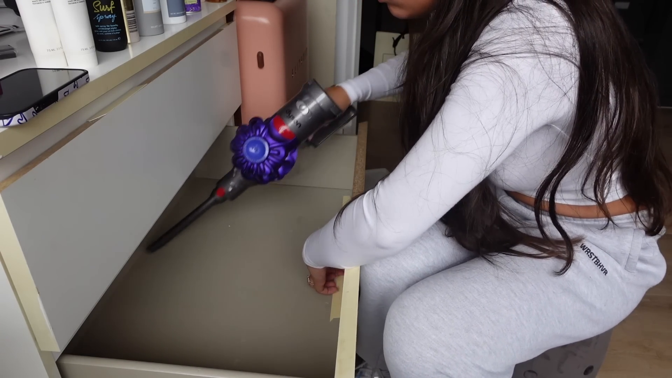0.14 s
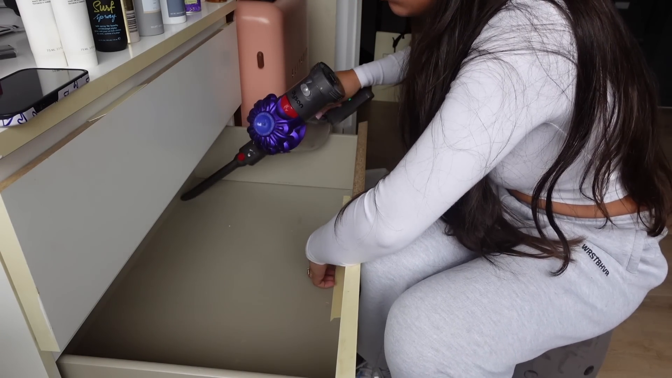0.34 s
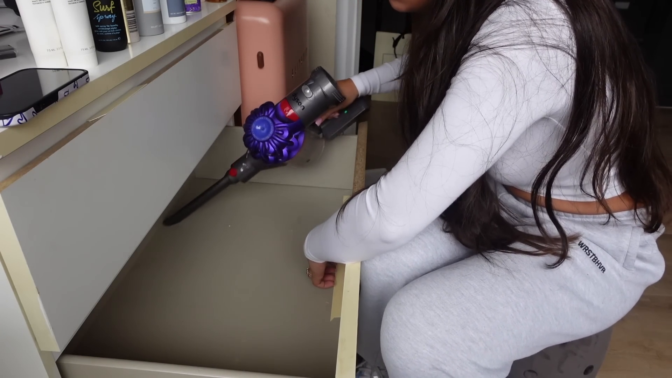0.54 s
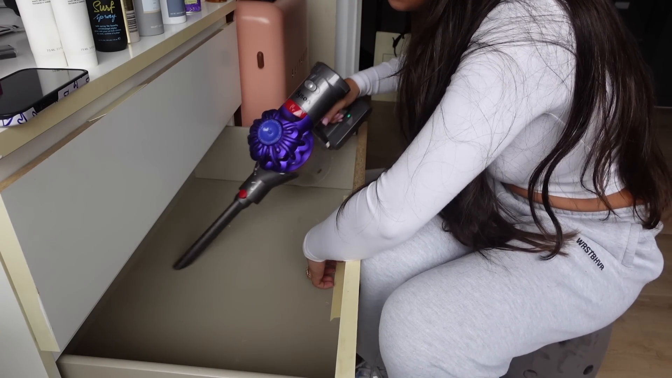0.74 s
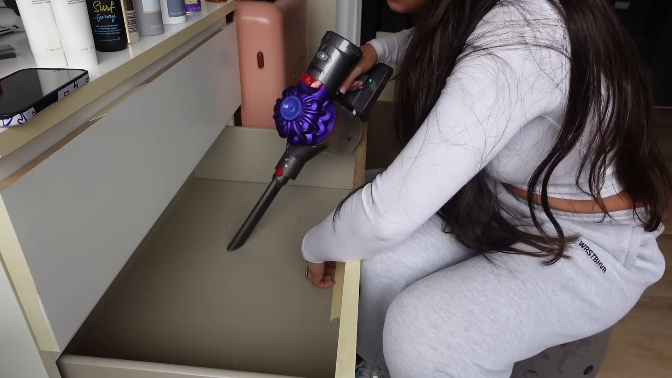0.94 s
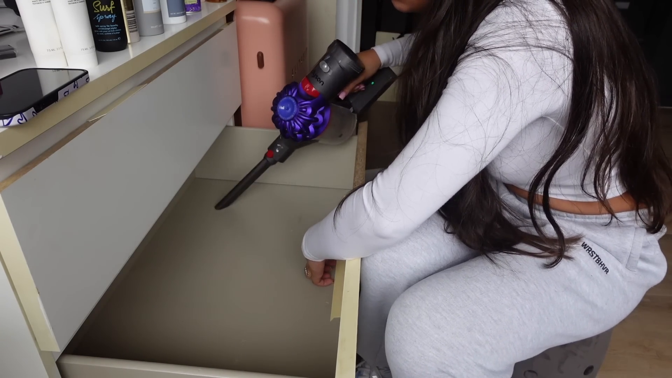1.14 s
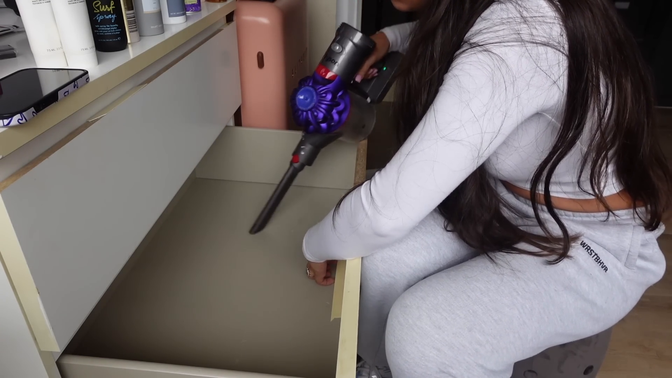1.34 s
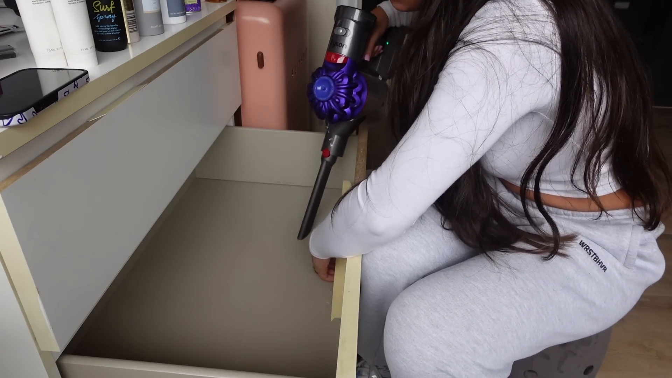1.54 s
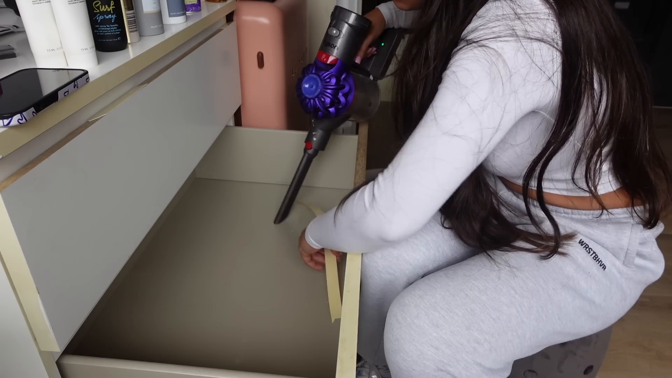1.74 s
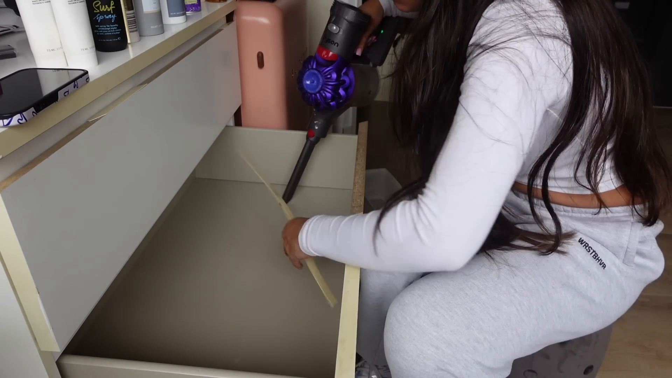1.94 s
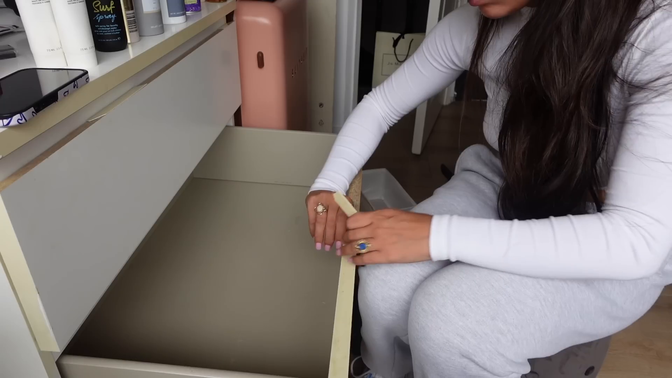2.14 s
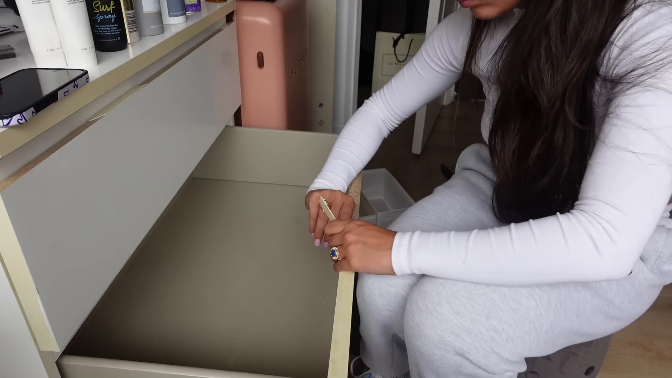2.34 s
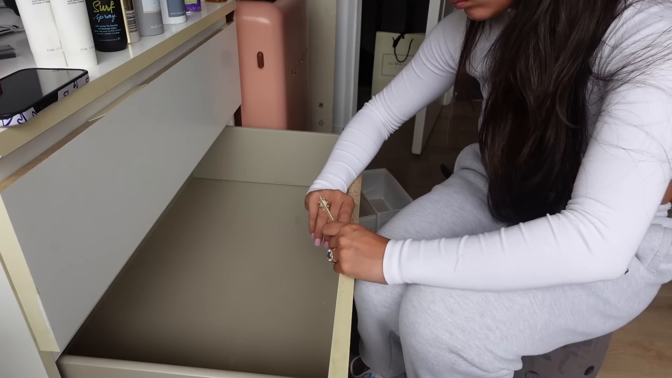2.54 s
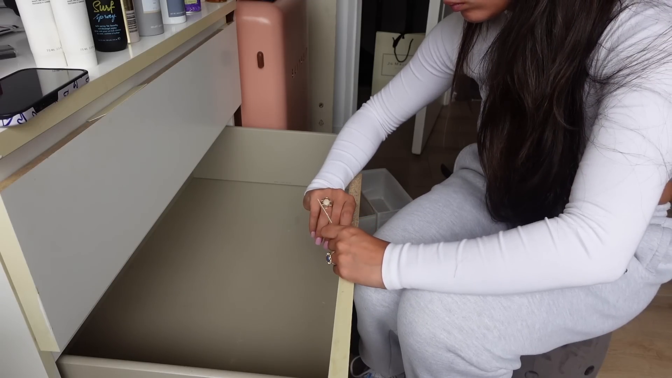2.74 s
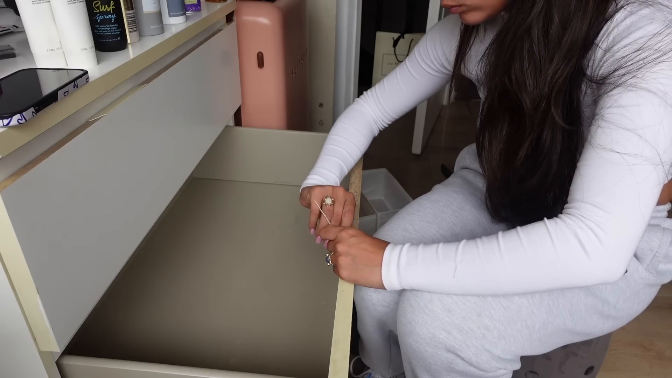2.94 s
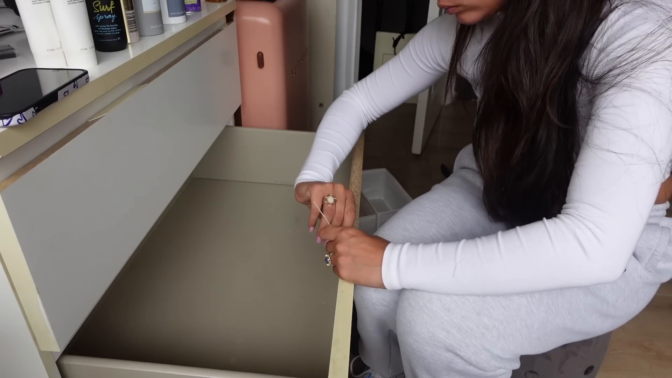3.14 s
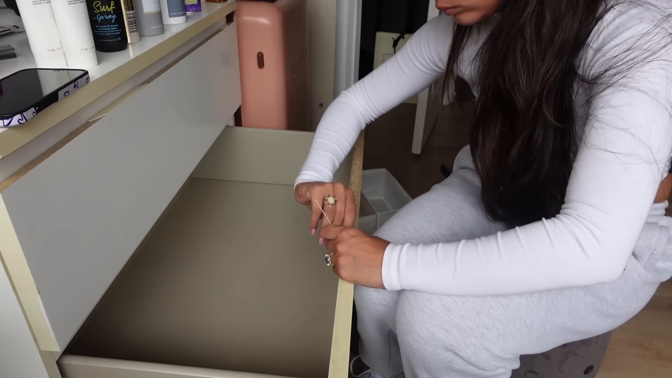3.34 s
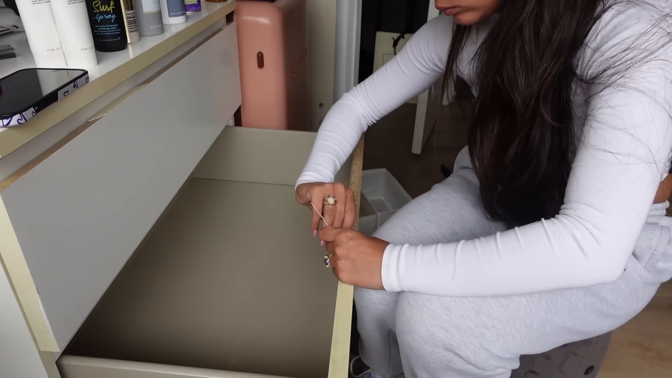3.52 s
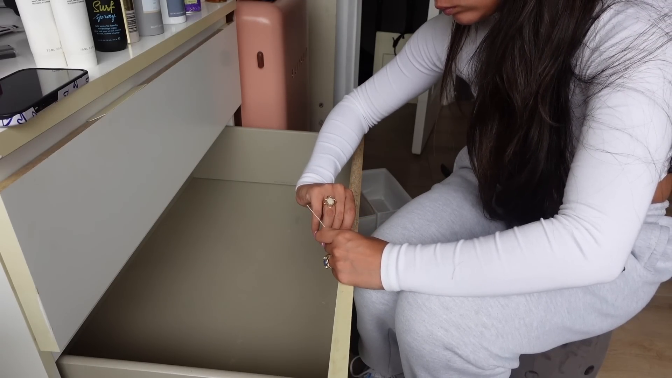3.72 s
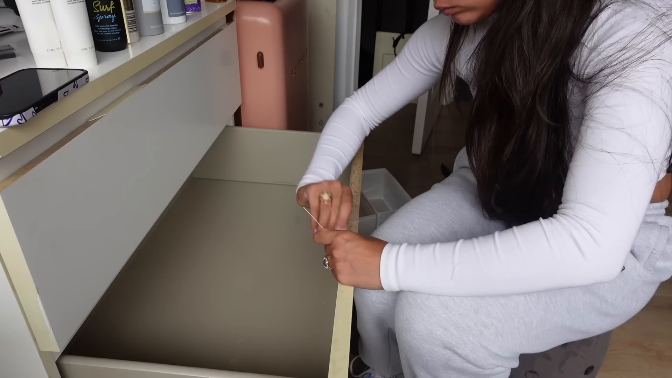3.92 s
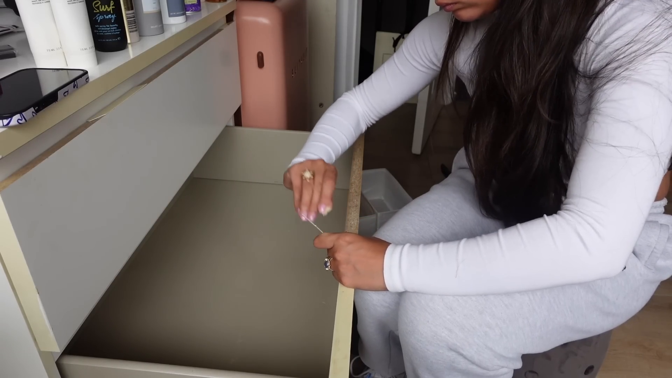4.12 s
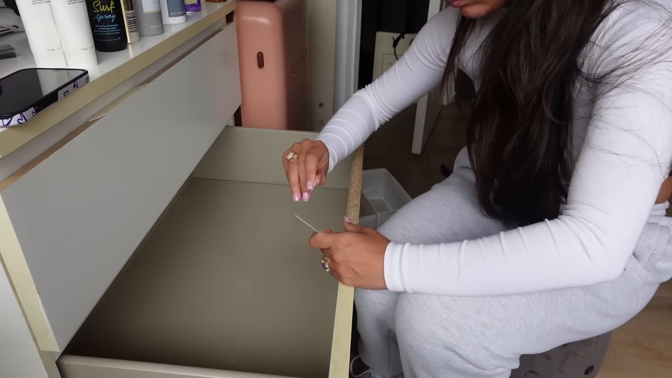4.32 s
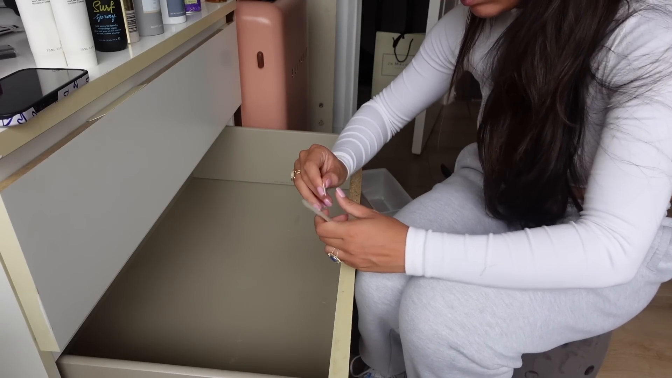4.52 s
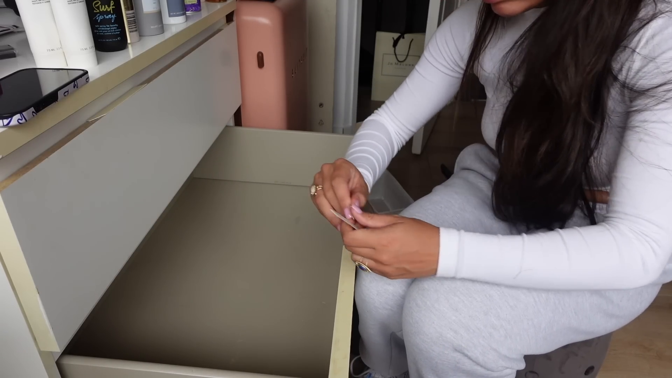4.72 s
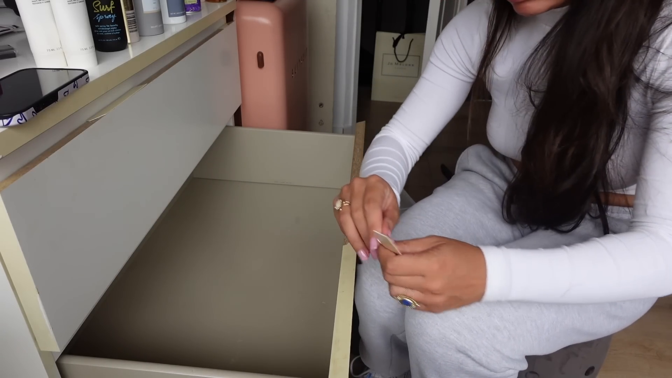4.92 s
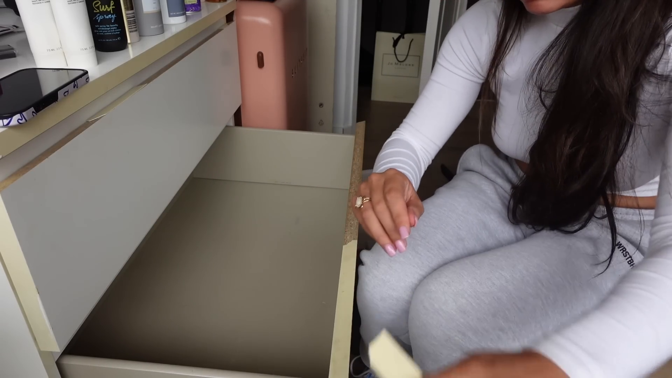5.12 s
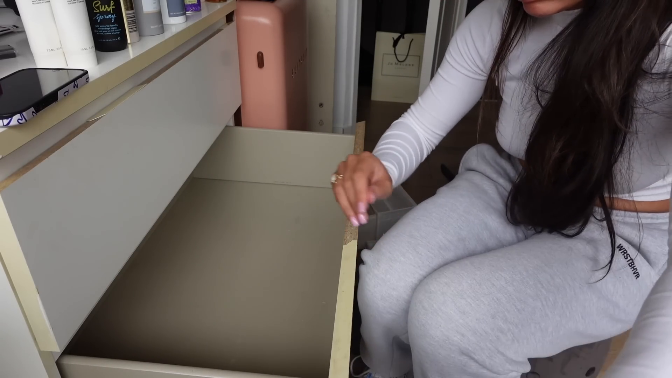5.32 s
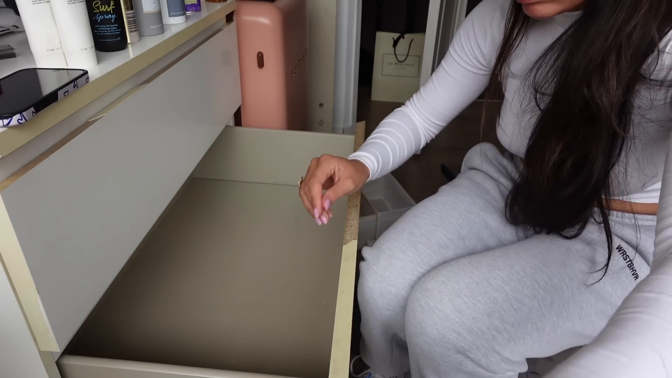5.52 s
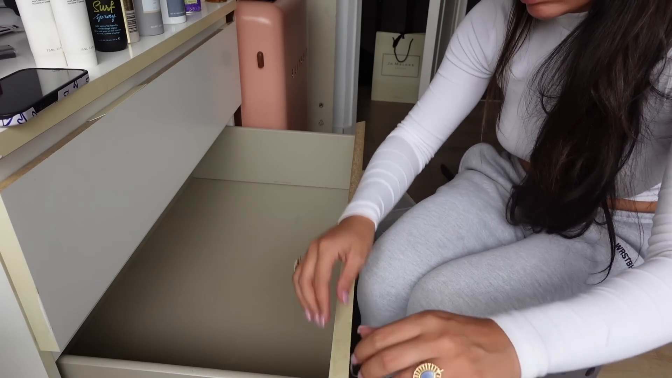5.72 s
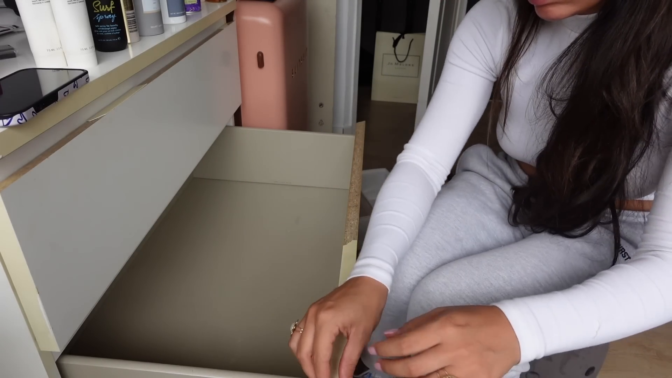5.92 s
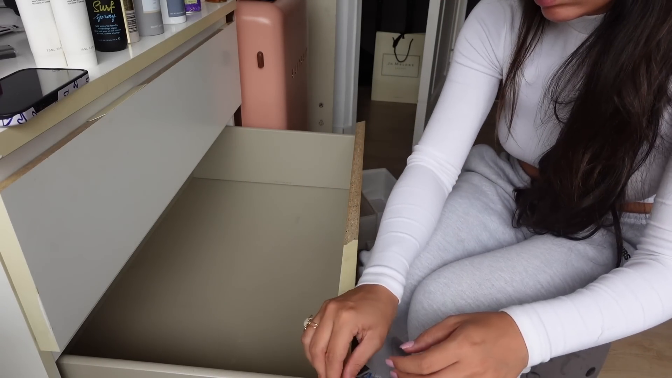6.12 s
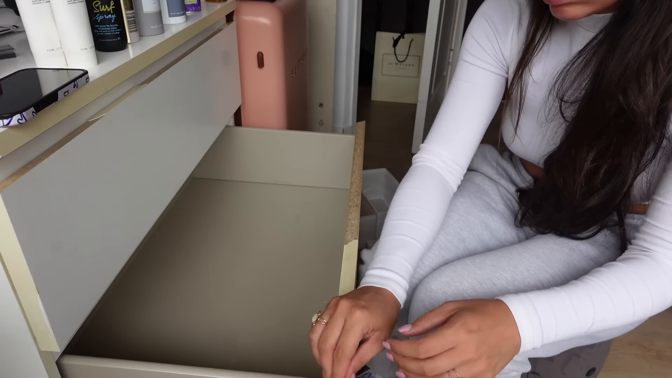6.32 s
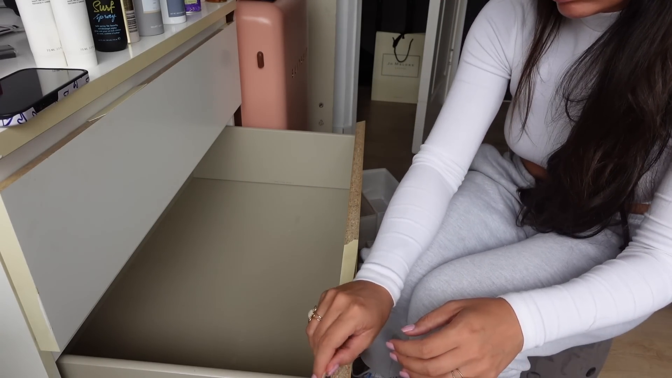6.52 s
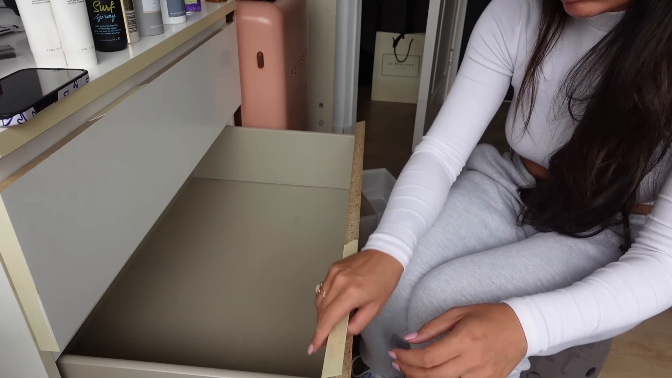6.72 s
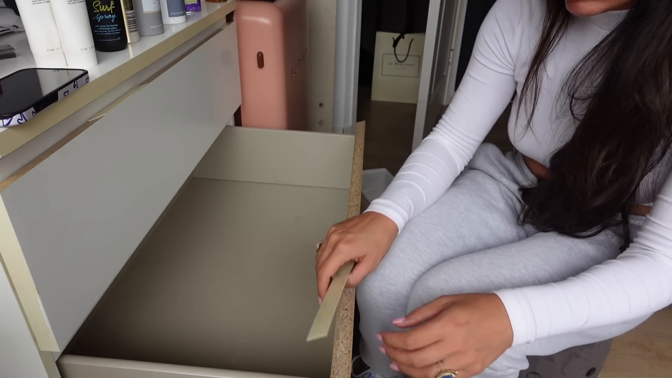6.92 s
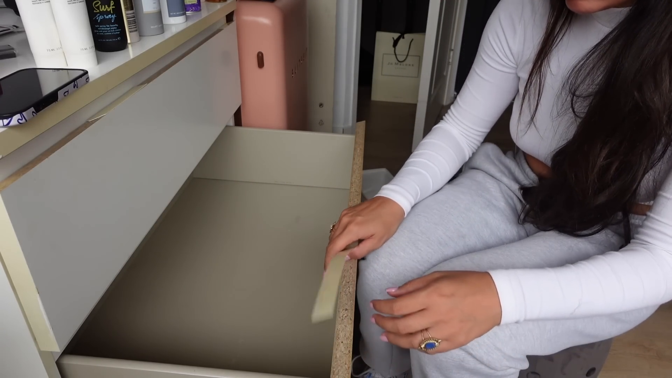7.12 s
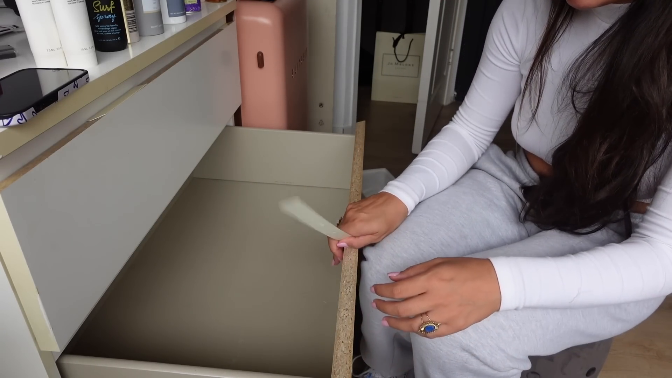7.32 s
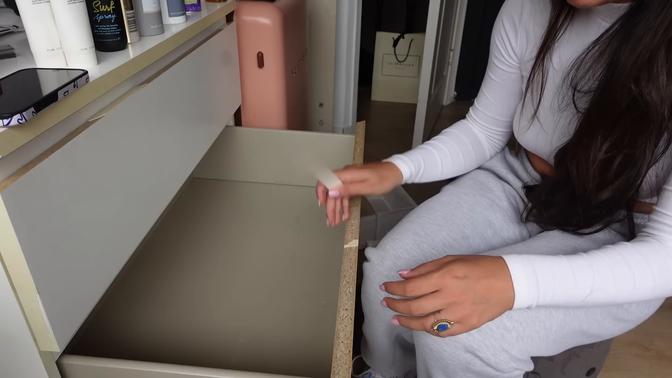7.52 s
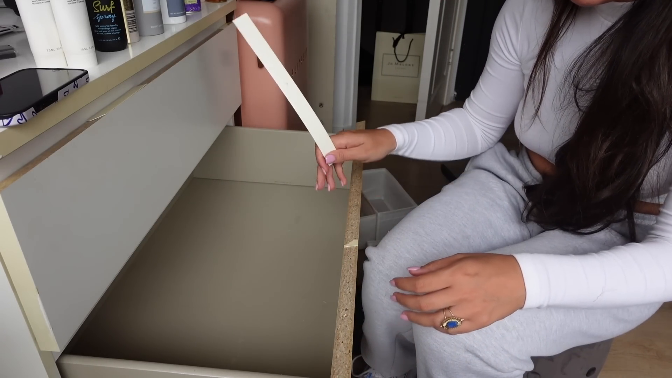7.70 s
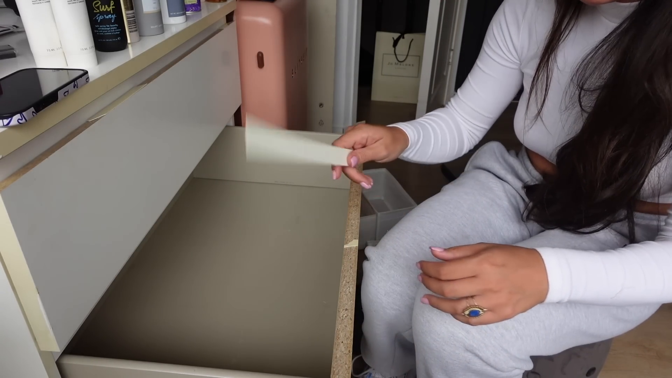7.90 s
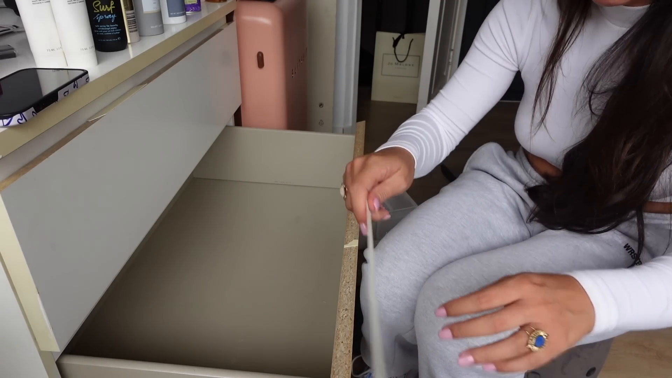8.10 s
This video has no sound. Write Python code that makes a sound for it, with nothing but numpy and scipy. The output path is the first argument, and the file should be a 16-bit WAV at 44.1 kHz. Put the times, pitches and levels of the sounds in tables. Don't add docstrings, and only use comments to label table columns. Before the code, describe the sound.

A handheld vacuum roars and whistles in a drawer, cuts off abruptly, then fingernails pick at a glued strip that tears off with loud snaps.

```python
import sys
import numpy as np
from scipy import signal
from scipy.fft import rfft, irfft, next_fast_len
from scipy.io import wavfile
from scipy.ndimage import uniform_filter1d, map_coordinates

SR = 44100
rng = np.random.default_rng(int(sys.argv[2]) if len(sys.argv) > 2 else 0)


def inscribe(sig):
    pcm = np.round(np.clip(np.atleast_2d(sig).T, -1, 1) * 32767)
    wavfile.write(sys.argv[1], SR, pcm.astype(np.int16))


def to_linear_factor(level_db):
    exponent = np.asarray(level_db, float) / 20
    return 10 ** exponent


N = 359856
CUT = round(2.0992 * SR)
SIZE = 2 ** 15
HZ = np.fft.rfftfreq(SIZE, 1 / SR)

# frequency in Hz, side relative to mid in dB.
JET_SIDE = [(60, -30), (130, -18.5), (290, -19.5), (640, -20), (1000, -34), (1400, -40), (2500, -34),
            (4000, -42.5), (6000, -39), (15000, -38.5)]
# frequency in Hz, side relative to mid in dB.
ROOM_SIDE = [(300, -9), (2000, -18), (5000, -46.5), (14000, -30)]
# frequency in Hz, width in Hz, level in dB.
EDGE_WOOD = [(232, 170, 1), (633, 490, -4), (1200, 620, -4)]


def unit(x):
    return x / np.sqrt(np.mean(x ** 2) + 1e-20)


def along(points, hz):
    f, v = np.transpose(points)
    return np.interp(np.log(hz + 1), np.log(f + 1), v)


def curves(rows):
    s, *columns = np.transpose(rows)
    return [np.interp(np.arange(N) / SR, s, column) for column in columns]


def wobble(rate):
    coarse = np.arange(0, N + 8, 8)
    knots = rng.standard_normal(int(N * rate / SR) + 4)
    return np.interp(np.arange(N), coarse, map_coordinates(knots, [coarse * rate / SR]))


def modes(hz, table):
    response = 0
    for k, (c, w, db) in enumerate(table):
        response = response + (-1) ** k * to_linear_factor(db) * 1j * hz * w / (c * c - hz * hz + 1j * hz * w)
    return response


def bell(hz, centre, width):
    return 1 / (1 + ((hz - centre) / width) ** 2)


def rush(gain, side, patchy_db, start, stop, flicker_db=0):
    hz, t, z = signal.stft(rng.standard_normal((2, stop - start)), SR, nperseg=1024)
    field = uniform_filter1d(rng.standard_normal(z.shape[1:]), size=8, axis=0)
    field = uniform_filter1d(field, size=8, axis=1)
    at = np.minimum(start + t * SR, N - 1).astype(int)
    z = z * to_linear_factor(patchy_db * unit(field)) * gain(hz[:, None], at)
    flicker = flicker_db * unit(field[::-1]) * (hz > 900)[:, None]
    z[1] *= to_linear_factor(along(side, hz)[:, None] + flicker)
    pair = signal.istft(z, SR, nperseg=1024)[1][:, :stop - start]
    return np.pad(pair / np.std(pair[0]), ((0, 0), (start, N - stop)))


def air():
    # frequency in Hz, density in dB per Hz.
    jet = [(25, -62), (100, -52), (140, -37), (170, -34.5), (200, -17), (930, -11.5), (1020, -7),
           (1440, -5), (2000, -3), (2700, -1), (3400, -5), (6540, -7.5), (9550, -15), (12500, -16),
           (15600, -25.5), (15900, -55)]
    # time in seconds, slit in Hz, corner in Hz, corner in dB, seal in dB.
    gap_rows = [(0, 2292, 877, 8, 2), (.2, 2428, 1078, 6, 3), (.33, 2400, 1408, 5.5, 3.5),
                (.45, 2333, 1302, -7, 4), (.65, 2460, 1091, 4.5, 3), (.9, 2300, 1403, -5.5, 2.5),
                (1.1, 2425, 1080, 2, 3), (1.4, 2167, 1049, -1.5, 4.5), (1.68, 2600, 1500, -2, 2),
                (1.76, 1755, 1096, -1.5, 5), (1.91, 1750, 1142, -10.5, 4.5), (2.0, 2300, 1300, -4.5, 2),
                (2.1, 2600, 1399, 3.5, 3)]
    # frequency in Hz, width in Hz, level in dB.
    cavity = [(207, 20, 6), (378, 24, 8), (479.7, 43, -4), (570, 35, 6), (810, 31, 8.5), (889, 50, -5.5),
              (1054, 25, 7), (2230, 50, 0.5), (2410, 43, 1.5), (2673, 34, 3), (4200, 150, 2.5),
              (5450, 170, -1.5), (6200, 150, 1.5), (8020, 300, 3)]
    # time in seconds, length in seconds, Hz, dB.
    spots = [(.3, .18, 2380, 2.5), (.2, .15, 2780, 1.5), (.55, .1, 2500, 2.5), (.48, 0.072, 2000, 3.5),
             (.95, .08, 2230, 4), (.88, .1, 3200, 3), (1.15, 0.13, 3080, 2.5), (1.3, 0.13, 3200, 3.5),
             (1.22, .1, 3600, 3), (1.3, .12, 2200, -3), (1.56, .08, 1700, 5.5), (1.65, .07, 2630, 4),
             (1.65, 0.18, 2420, -2.5), (1.84, .07, 1800, 4), (1.95, .07, 2270, 4), (1.85, .15, 2900, 1.5),
             (2.07, .06, 2700, 3.5), (.5, 0.13, 4700, -3), (1.55, .08, 2500, -3), (.2, 0.14, 780, 2.5),
             (.6, 0.14, 2200, 1.5), (1.9, 0.073, 1300, -4), (2.0, 0.094, 780, 4), (.1, .08, 800, -1),
             (1.1, .15, 730, 1.5), (1.85, .15, 3900, 2), (0, 0.14, 780, 4), (0, .2, 1700, 3),
             (0, .2, 2670, -3.5), (.42, 0.076, 4310, 4), (0.5, .07, 860, -4), (1, .09, 2200, 3.5),
             (0.8, .08, 2400, 2), (1.1, .12, 1940, -3), (1.34, .2, 4090, 3), (1.55, .07, 3570, -4),
             (1.57, 0.1, 1250, 4.5), (1.77, .12, 4520, 4.5), (1.7, .07, 2330, -3.5), (2.1, .07, 2760, -3),
             (2.1, .2, 3660, 2.5), (1.5, .05, 2150, -2.5)]
    bumps = [0, .04, .44, 1.2, 1.36, 1.82, 2.0]
    slit_hz, corner_hz, corner_db, seal_db = curves(gap_rows)
    since = np.arange(N) / SR - np.array(bumps)[:, None]
    bump_db = 9.5 * np.sum(np.exp(-(since / .062) ** 2), axis=0)

    def colour(hz, at):
        boom = .5 / (1 + (hz / 900) ** 4)
        bump = bump_db[at] / (1 + (hz / 300) ** 4 + (170 / (hz + 1)) ** 8)
        body = (seal_db[at] - 3) / (1 + (np.log((hz + 1) / 1900) / .5) ** 4)
        slit = .92 * seal_db[at] * bell(hz, slit_hz[at], 250)
        corner = corner_db[at] * bell(hz, corner_hz[at], 120)
        box = sum(db * bell(hz, c, w) for c, w, db in cavity)
        for s, lasts, c, db in spots:
            box = box + db * np.exp(-((at / SR - s) / lasts) ** 2) * bell(hz, c, 100)
        choked = .59 * seal_db[at]
        return to_linear_factor(along(jet, hz) + boom + bump + body + slit + corner + box - choked)

    jet_noise = rush(colour, JET_SIDE, patchy_db=.8, start=0, stop=CUT, flicker_db=8)
    return to_linear_factor(-13.2 + .4 * wobble(12)) * jet_noise


def motor():
    # time in seconds, blade tone in Hz, blade tone in dB, shaft tone in dB.
    speed = [(0, 11790, -29, -29), (.2, 11785, -29, -25), (.35, 11772, -26, -28), (.5, 11780, -23, -28),
             (.62, 11785, -23.5, -36), (.72, 11790, -23, -35), (.85, 11805, -28, -40),
             (1.0, 11860, -25, -37), (1.2, 11795, -27, -37), (1.32, 11788, -30, -36),
             (1.42, 11805, -25, -40), (1.6, 11822, -23.5, -38), (1.85, 11815, -25.5, -36),
             (1.97, 11795, -30, -29), (2.1, 11778, -32, -28)]
    # time in seconds, then second, third and fourth
    # shaft order, bearing and housing whistle in dB.
    load = [(0, -34.5, -39.5, -40, -30.5, -33), (.2, -32, -38, -39.5, -29, -33),
            (.4, -38.5, -33.5, -38, -34, -35), (.6, -33, -33.5, -32, -31, -31),
            (.75, -29.5, -40, -38, -27, -27.5), (.9, -32, -39, -31.5, -26.5, -31),
            (1.05, -36, -40, -35, -26, -33), (1.25, -38, -30, -38.5, -28.5, -31.5),
            (1.4, -38, -34, -35, -34, -31.5), (1.55, -38, -39, -34, -32.5, -29.5),
            (1.7, -37, -34, -38, -33, -26), (1.85, -37, -32, -38, -32, -30),
            (2.0, -34, -31, -30.5, -27.5, -33), (2.1, -33, -33.5, -32, -26, -32.5)]
    blades, cage = 7, .4665
    blade_hz, blade_db, shaft_db = curves(speed)
    *orders_db, bearing_db, whistle_db = curves(load)
    turn = 2 * np.pi * np.cumsum(blade_hz / blades * (1 + .0002 * wobble(60))) / SR
    tones = to_linear_factor(shaft_db + 1 + .8 * wobble(14)) * np.sin(turn + .15 * wobble(30))
    for order, db in enumerate(orders_db, start=2):
        tones += to_linear_factor(db + 1 + .8 * wobble(25)) * np.sin(order * turn)
    bearing = to_linear_factor(bearing_db + 2 + 1.5 * wobble(12) + 2.2 * wobble(60))
    tones += bearing * np.sin((blades - cage) * turn + .8 * wobble(90))
    tones += to_linear_factor(-48 + 3 * wobble(8)) * np.sin((blades + cage) * turn)
    blade = to_linear_factor(blade_db + 1.9 * wobble(25)) * np.sin(blades * turn)

    def housing(hz, at):
        return abs(modes(hz, [(10660, 130, 0)])) ** 2

    whistle = rush(housing, JET_SIDE, patchy_db=2.5, start=0, stop=CUT)
    steady = np.sqrt(2) * (tones * to_linear_factor([[0], [-40]]) + blade * to_linear_factor([[0], [-22]]))
    return steady + to_linear_factor(whistle_db + 1.5 * wobble(6)) * whistle


def jolt():
    t = np.arange(N) / SR
    shudder = np.cos(2 * np.pi * 45 * t) + to_linear_factor(9) * np.cos(2 * np.pi * 205 * t)
    return to_linear_factor(-43.5 - 60 * t / .35) * shudder * [[1], [.05]]


def ring(table):
    soft = 1 / (1 + 1j * HZ / (1.7 * table[-1][0])) ** 2
    thin = 1j * HZ / (.6 * table[0][0] + 1j * HZ)
    response = modes(HZ, table) * soft * thin
    return response / abs(irfft(response)).max()


def ticks(events, wood, width, tear_db, tear_t60):
    t, panel = np.arange(SIZE // 4) / SR, ring(wood)
    for s, db, edge_hz, strip_db, strip_hz, wood_db in events:
        push = to_linear_factor(tear_db - 60 * t / tear_t60) * rng.standard_normal(len(t))
        push[0] = 1
        steep = 1j * HZ / (strip_hz / 2 + 1j * HZ)
        dull = 1 + .6j * HZ / edge_hz - (.51 * HZ / edge_hz) ** 2
        edge = ring([(edge_hz, width * edge_hz, 0)]) * steep / dull
        strip = to_linear_factor(strip_db + 3.5) * ring([(strip_hz, width * strip_hz, 0)])
        struck = (edge + strip) * steep + to_linear_factor(wood_db - 7.5) * panel
        yield s + .0008, to_linear_factor(db + .5) * rfft(push, SIZE) * struck


def snaps():
    # time in
    # seconds, peak in dB, edge in Hz, strip in Hz.
    releases = [(3.9504, -20, 6300, 5180), (3.9596, -6, 6400, 4350), (3.9614, -11, 4500, 2600),
                (4.0254, -13, 5000, 2400), (4.2228, -36, 3600, 2530), (4.3404, -50, 4000, 2220),
                (7.1626, -4, 5300, 5270), (7.167, -16, 9000, 5200), (7.2190, -4.5, 9800, 5350),
                (7.224, -19, 9000, 5350), (7.2915, -1.5, 9800, 5120), (7.3114, -3, 7000, 4300),
                (7.3174, -11, 6720, 4170), (7.3234, -8, 6600, 5390)]
    for s, db, edge_hz, strip_hz in releases:
        yield s, db, edge_hz, -11 - .25 * (db + 11), strip_hz, -43 - db


def picks():
    # time in seconds, peak in dB, edge in Hz, strip in dB.
    nails = [(3.067, -51, 6740, -9.5), (3.0982, -36.5, 7250, -21), (3.1217, -30.5, 6030, -17),
             (3.154, -36.5, 8170, -14), (3.165, -22, 8700, -9.5), (3.307, -46, 7840, -17),
             (3.3265, -34, 7490, -26), (3.3687, -44, 7700, -13), (3.408, -32, 7650, -13),
             (3.4291, -22.5, 7400, -13.5), (3.543, -31, 7430, -26), (3.6671, -27, 7700, -24),
             (3.6890, -31, 6980, -19), (3.7349, -20.5, 7100, -10.5), (3.8163, -35, 7210, -28),
             (3.91, -53, 6930, -13), (5.3407, -55, 5640, -5), (5.4134, -46.5, 5550, -4.5),
             (5.451, -37, 8200, 2), (5.455, -41, 4000, -2), (5.5788, -42, 6800, 5.5),
             (6.6192, -45.5, 5826, -3), (6.68, -41, 6960, -13), (6.7761, -49, 5690, 5),
             (6.554, -54, 4000, 0), (7.7187, -40.5, 4300, -10), (8.005, -47, 5200, -10),
             (7.886, -47.5, 5580, -8)]
    slack_hz, stiff_hz, taut_db = 2300, 4930, -43
    for s, db, edge_hz, strip_db in nails:
        strip_hz = slack_hz + (stiff_hz - slack_hz) / (1 + to_linear_factor(2 * (taut_db - db)))
        yield s, db, edge_hz, strip_db, strip_hz, -22 - .85 * (db + 26.5)


def knocks():
    # time in seconds, peak in dB, board in Hz, panel in dB.
    blows = [(2.4538, -44, 1600, -14), (2.4564, -39, 1080, 1), (2.5946, -50, 1480, -7),
             (2.6137, -44, 1500, -11), (2.6694, -50, 1130, -8), (2.817, -49.5, 1400, -10),
             (3.9600, -36, 574, -6), (4.095, -40.5, 910, 0), (4.153, -44, 1920, -14),
             (5.1194, -57, 710, -5), (5.8422, -35, 1000, -9), (5.861, -42, 1200, -16),
             (2.642, -51, 1200, -8), (8.109, -55, 1090, 6), (6.0485, -47.5, 2160, -8),
             (6.2716, -43, 1660, -18), (6.286, -42.5, 1670, -22), (6.4255, -43, 1700, -10),
             (7.5543, -52, 865, -9), (7.9465, -52, 1300, 1), (8.0608, -49.5, 1200, 5),
             (5.5795, -45, 2200, -25)]
    for s, db, board_hz, panel_db in blows:
        yield s, db, 2400, 0, board_hz, panel_db


def tears():
    # time in seconds, peak in dB, Hz,
    # length in seconds, width as share of Hz.
    strokes = [(2.456, -40.5, 4500, .02, 0.89), (2.457, -42.5, 2850, 0.011, 0.06),
               (2.457, -49, 2500, .02, .06), (2.457, -47.5, 1070, 0.014, 0.14),
               (2.459, -50, 250, .028, 0.28), (2.458, -49.5, 600, .02, .3), (2.622, -50, 1970, .037, 1),
               (3.124, -40.5, 5645, 0.036, .6), (3.167, -37.5, 5180, 0.028, 0.24),
               (3.9528, -10.5, 6310, 0.006, 1), (3.963, -18.5, 4600, 0.044, .2),
               (3.962, -25, 2540, .033, 0.16), (3.96, -20.5, 6900, 0.042, .5), (4.026, -26, 2260, .025, .8),
               (3.9556, -28.5, 1200, 0.048, 1), (3.997, -24, 4260, .055, .85), (4.225, -49.5, 2380, .04, 1),
               (5.348, -49.5, 5010, 0.056, .79), (5.417, -42.5, 3460, 0.026, .86),
               (5.837, -37, 1650, 0.063, 1), (5.838, -40, 5300, 0.074, 0.69),
               (5.886, -40.5, 1760, 0.092, 1), (6.271, -41, 1640, 0.037, 0.37), (6.271, -47, 5100, 0.05, 1),
               (6.662, -43, 4200, 0.07, 1), (7.1632, -27, 5300, .035, 0.07),
               (7.166, -33.5, 10000, .03, 0.65), (7.163, -39.5, 2850, 0.025, 0.058),
               (7.163, -36, 6290, .03, 0.039), (7.164, -45, 1970, .02, 0.097), (7.22, -33, 5440, .035, .06),
               (7.222, -27, 8800, .035, .15), (7.22, -40.5, 2700, .02, .2), (7.221, -34, 9500, 0.025, .5),
               (7.2935, -12.5, 9500, .014, 0.55), (7.294, -13, 4600, .02, 0.46),
               (7.312, -9.5, 6600, .05, 0.78), (7.2933, -34.5, 1067, 0.029, 0.28),
               (7.293, -33, 2310, .07, 0.11), (7.295, -23, 4400, .06, .1)]
    t, wood = np.arange(SIZE // 4) / SR, ring(EDGE_WOOD)
    for s, db, hz, length, width in strokes:
        slips = rng.standard_normal((2, SIZE // 4))
        fade = np.clip(4 - 4 * t / length, 0, 1)
        push = slips[0] * to_linear_factor(5.37 * slips[1] - 8 * t / length) * fade
        wood_db = -14.5 - 3.5 * hz / 1000
        yield s, to_linear_factor(db - 19) * rfft(push, SIZE) * (ring([(hz, width * hz, 0)]) + to_linear_factor(wood_db) * wood)


def swells(s, db, rise_s, fall_s):
    t = np.arange(0, N + 256, 256)[:, None] / SR - s
    below_db = 10 * np.maximum(-t / abs(rise_s), t / abs(fall_s))
    level = 10 * np.log10(np.sum(to_linear_factor(2 * (db - below_db)), axis=1) + 1e-12)
    return np.interp(np.arange(N) / 256, np.arange(len(level)), level)


def rubbing():
    # peak time in seconds, peak in dB, seconds to rise 10 dB, seconds to fall
    # 10 dB (signs ignored), fizz over peel in dB.
    pulls = [(2.36, -60.5, -0.1, 0.4, -9), (2.6, -64, -0.2, .5, -9.5), (3.25, -68, 0.3, .8, 2),
             (3.77, -64, 0.35, -7.2, -7), (4.02, -58, 0.5, 0.24, -7), (4.56, -61, 0.3, -0.4, -9),
             (5.27, -62, -0.1, .04, -4), (5.36, -58, -0.1, .1, -5.5), (5.47, -50.5, 0.04, 0.2, -6.5),
             (6.03, -64, -1.5, 1.5, -6), (6.66, -54.5, 0.12, 0.8, -10), (6.73, -54, 0.1, .04, -2.5),
             (6.95, -48, 0.17, 0.37, -2.5), (7.13, -43, 0.2, 0.05, -1.5), (7.24, -51, 0.08, 0.16, 6.5),
             (7.43, -57, 0.7, -0.5, -14), (7.78, -72, -2, 3, -6)]
    # peak time in seconds, peak in dB, seconds to rise and to fall 10 dB.
    arm = [(2.64, -55, 0.5, 0.5), (3.25, -60, 0, 0), (3.77, -58.5, 1.6, 1.5), (4.01, -44.5, 0.05, 0.21),
           (4.25, -53.5, -0.4, 0.1), (4.8, -63.5, 0, 3.5), (5.51, -53.5, 0.14, 0), (6.03, -54, 0.5, 0.1),
           (6.62, -55, 1, 0.35), (7.05, -60, 1, -0.7), (7.26, -50.5, 0.37, -0.5), (7.55, -68, 2, -0.7),
           (8.14, -59, 4, 2.5)]
    # frequency in Hz, width in Hz, level in dB.
    strip = [(2860, 90, 3.5), (3930, 120, 2.5), (4610, 120, 1.5), (5370, 180, 4.5), (7700, 300, 3.5),
             (9700, 300, 0.5)]
    # frequency in Hz, density in dB per Hz.
    peel_colour = [(1500, -120), (2300, -0.5), (4500, 0.5), (7000, -2.5), (9000, -120)]
    fizz_colour = [(5000, -120), (7000, 1), (10000, 1), (15500, -3), (15900, -56.5)]
    sleeve_colour = [(200, -120), (400, -7), (1800, -2), (2300, -4.5), (4200, -61.5)]
    s, db, rise_s, fall_s, bright_db = np.transpose(pulls)
    peel_db = swells(s, db, rise_s, fall_s)
    fizz_db = swells(s, db + bright_db, rise_s, fall_s)
    sleeve_db = swells(*np.transpose(arm))

    def lifted(spectrum):
        return lambda hz, at: to_linear_factor(along(spectrum, hz) + sum(gain * bell(hz, c, w) for c, w, gain in strip))

    def cloth(hz, at):
        return to_linear_factor(along(sleeve_colour, hz))

    slips = unit(to_linear_factor(1.5 * wobble(600) + .8 * wobble(40) + .8 * wobble(200)))
    peel = to_linear_factor(peel_db - 4) * rush(lifted(peel_colour), ROOM_SIDE, patchy_db=2.5, start=CUT, stop=N)
    fizz = to_linear_factor(fizz_db - 3) * rush(lifted(fizz_colour), ROOM_SIDE, patchy_db=0, start=CUT, stop=N)
    sleeve = to_linear_factor(sleeve_db - 5) * rush(cloth, ROOM_SIDE, patchy_db=1.1, start=CUT, stop=N)
    return slips * (peel + fizz) + sleeve


def room(count):
    # frequency in Hz, time to fall 60 dB in seconds.
    decay = [(300, .3), (2000, .27), (5500, .24), (14000, .21)]
    hz, t, z = signal.stft(rng.standard_normal((count, 2, SIZE // 2)), SR, nperseg=256)
    z = z * to_linear_factor(-60 * t / along(decay, hz)[:, None])
    z[:, 1] *= to_linear_factor(along(ROOM_SIDE, hz))[:, None]
    tail = np.pad(signal.istft(z, SR, nperseg=256)[1], ((0, 0), (0, 0), (150, 0)))
    return rfft(tail, SIZE) / np.linalg.norm(tail[0, 0])


def placed(sounds, walls_db, room_db):
    # delay in seconds, level in dB.
    echoes = [(.0032, -0.5), (.0062, -10), (0.0115, -11)]
    out, tails = np.zeros((2, N + SIZE)), room(count=3)
    walls = 1 + to_linear_factor(walls_db) * sum(to_linear_factor(db) * np.exp(-2j * np.pi * HZ * s) for s, db in echoes)
    spaces = walls * [[1], [.07]] + to_linear_factor(room_db) * tails
    for k, (s, direct) in enumerate(sounds):
        heard = irfft(direct * spaces[k % len(spaces)])
        out[:, round(s * SR):][:, :SIZE // 2] += heard[:, :SIZE // 2]
    return out[:, :N]


def hush():
    # frequency in Hz, density in dB per Hz.
    tone_colour = [(24, -49), (40, -20), (250, -2.5), (650, -9.5), (900, -12), (1400, -23), (2400, -18),
                   (3400, -23), (5500, -23.5), (9000, -26.5), (15600, -29.5), (16000, -60)]
    # frequency in Hz, side relative to mid in dB.
    tone_side = [(60, -9), (110, -5.5), (200, -3), (380, -6), (700, -1), (1290, -0.5), (2380, 0),
                 (4400, -4), (8120, -12), (15000, -28.5)]
    # frequency in Hz, width in Hz, level in dB.
    drone = [(1130, 75, 0), (1880, 140, -6.5), (646, 60, -9)]

    def colour(hz, at):
        return np.hypot(to_linear_factor(along(tone_colour, hz)), to_linear_factor(3.5) * abs(modes(hz, drone)) ** 2)

    return to_linear_factor(-61.5) * rush(colour, tone_side, patchy_db=1.3, start=CUT, stop=N)


def scene():
    # frequency in Hz, width in Hz, level in dB.
    bottom = [(222, 75, 7), (428, 142, -7)]
    vacuum = (np.arange(N) < CUT) * (air() + motor() + jolt())
    snapping = ticks(snaps(), EDGE_WOOD, width=.5, tear_db=-22, tear_t60=.04)
    picking = ticks(picks(), EDGE_WOOD, width=.3, tear_db=-23, tear_t60=.04)
    knocking = ticks(knocks(), bottom, width=.35, tear_db=-20, tear_t60=.05)
    hands = placed(snapping, walls_db=-9, room_db=-4.5)
    hands += placed(picking, walls_db=-2.5, room_db=-1.5)
    hands += placed(knocking, walls_db=-10, room_db=-4.5)
    hands += placed(tears(), walls_db=-9, room_db=-2.5)
    tone = hush()
    mid, side = vacuum + hands + rubbing() + tone
    side += .17 * tone[0]
    return np.array([mid + side, mid - side])


def top_cut(x):
    return signal.sosfilt(signal.butter(12, 16480, fs=SR, output="sos"), x)


def record(dry):
    size = next_fast_len(N + SR // 4)
    hz = np.fft.rfftfreq(size, 1 / SR)
    band = 1 / np.sqrt((1 + (60 / (hz + 1)) ** 4) * (1 + (hz / 15780) ** 200))
    rounded = dry / (1 + abs(dry / .95) ** 5) ** (1 / 5)
    heard = irfft(rfft(rounded, size) * band, size)[:, :N]
    return top_cut(heard)


dry = scene()
out = record(dry)
inscribe(out)
```